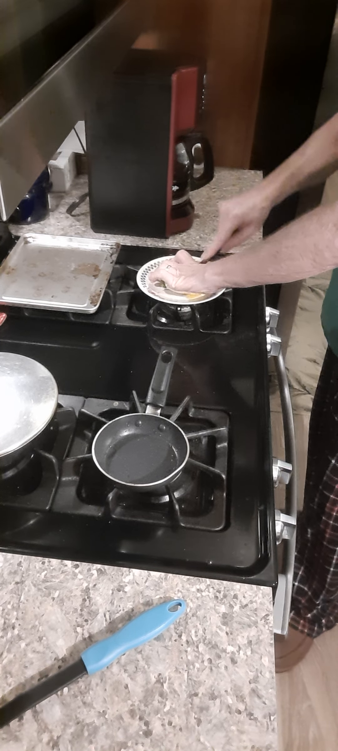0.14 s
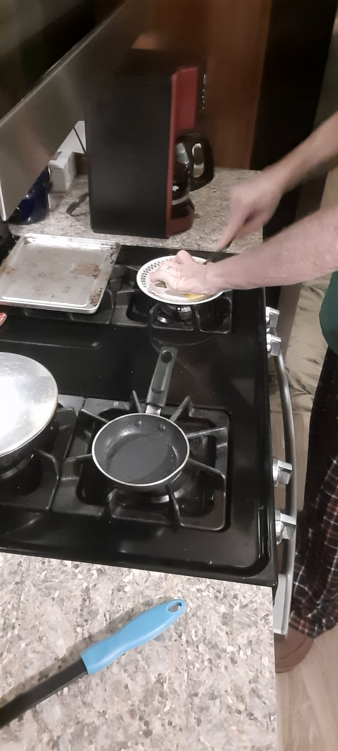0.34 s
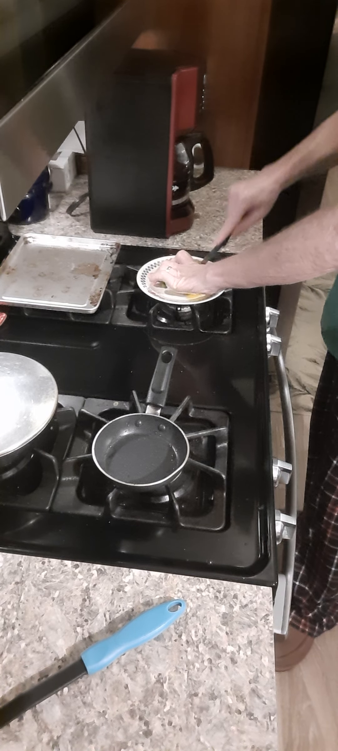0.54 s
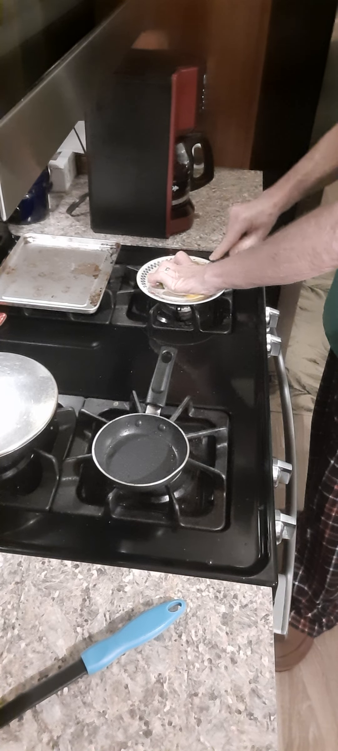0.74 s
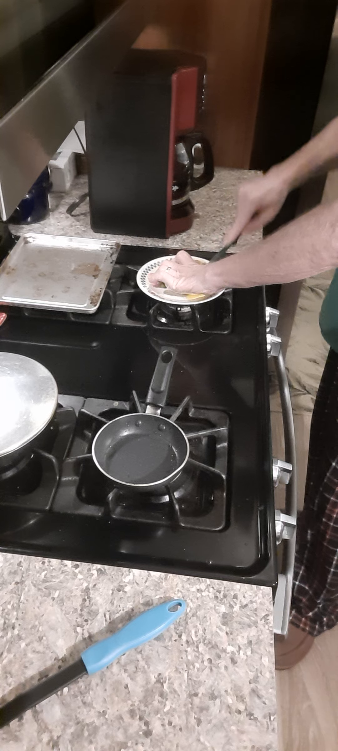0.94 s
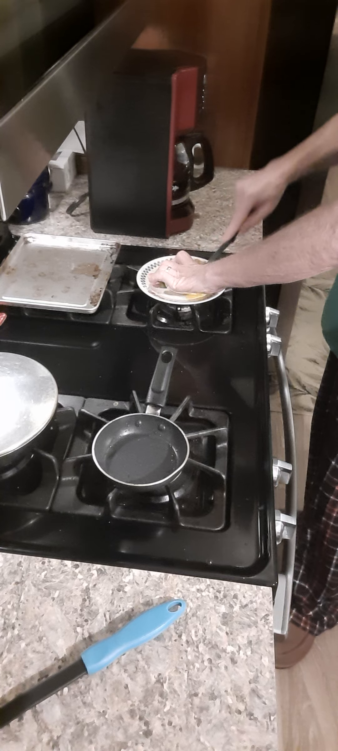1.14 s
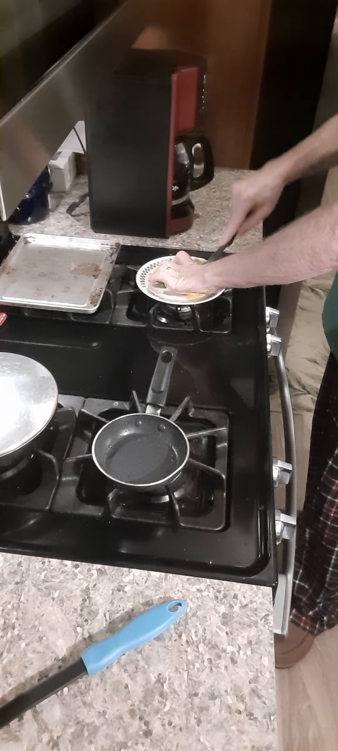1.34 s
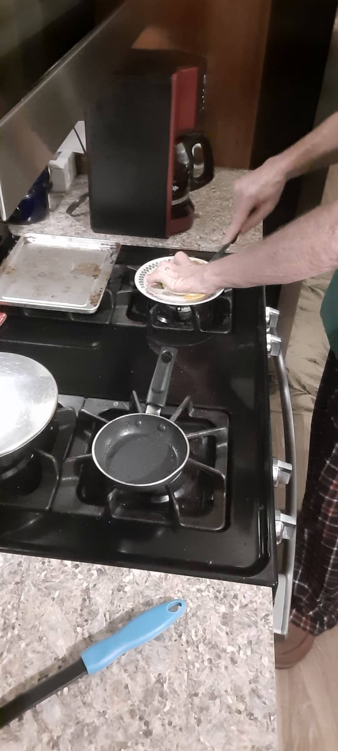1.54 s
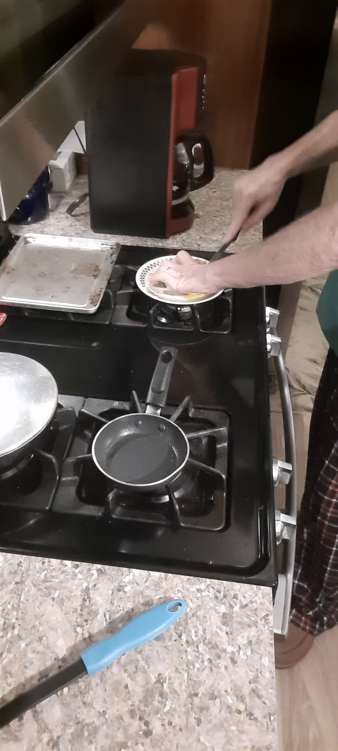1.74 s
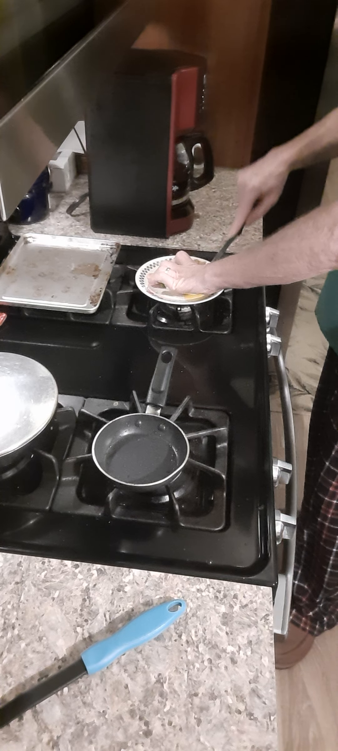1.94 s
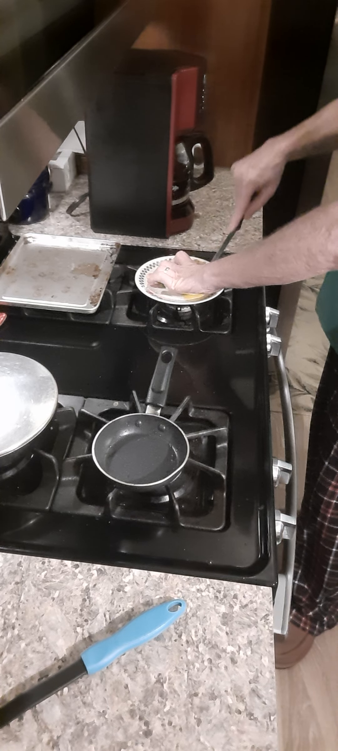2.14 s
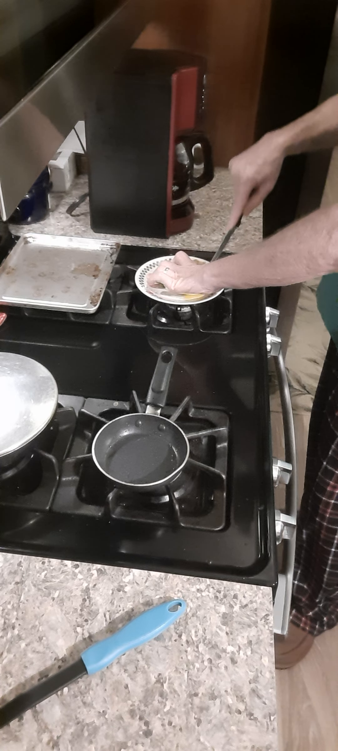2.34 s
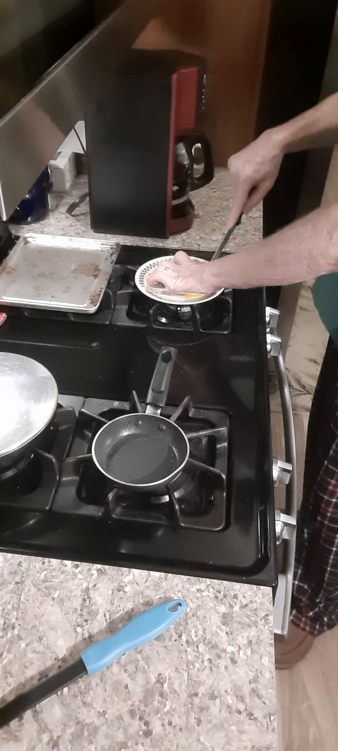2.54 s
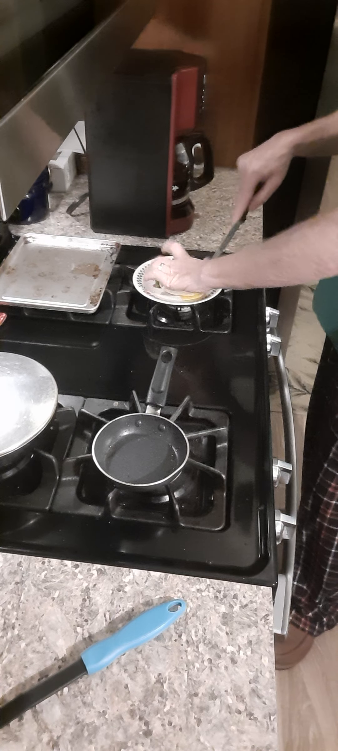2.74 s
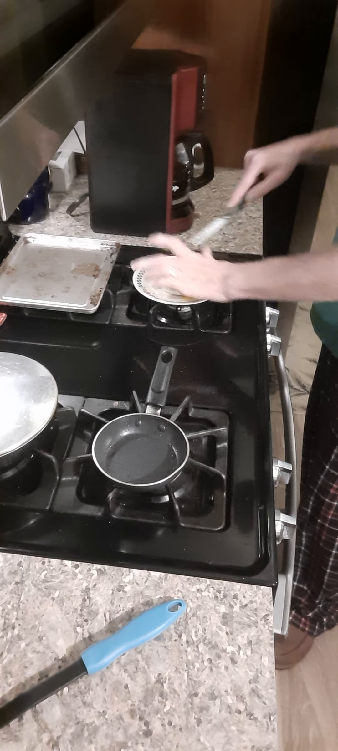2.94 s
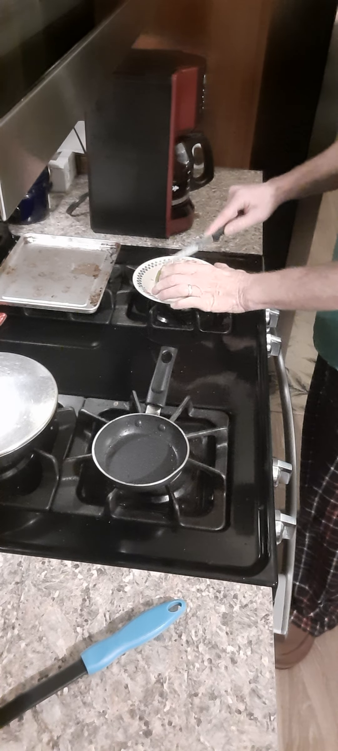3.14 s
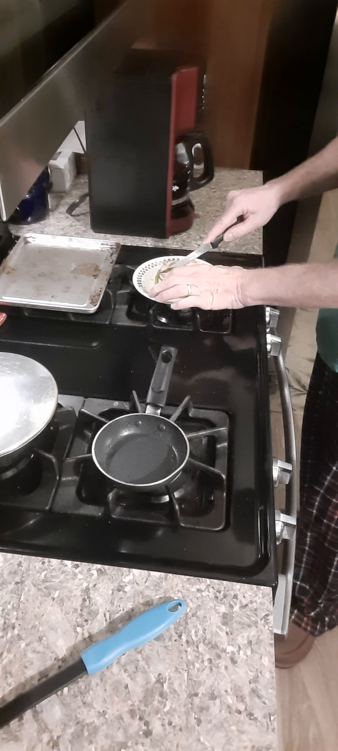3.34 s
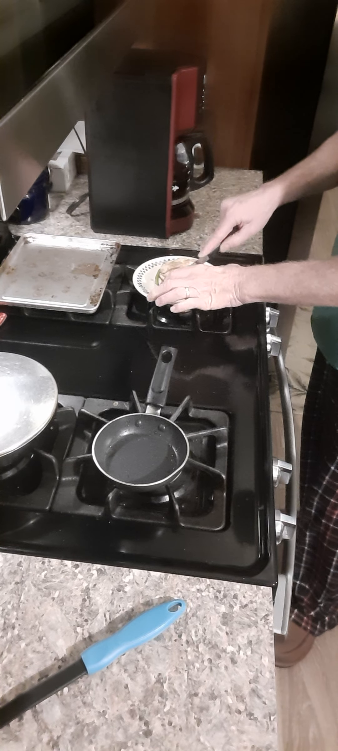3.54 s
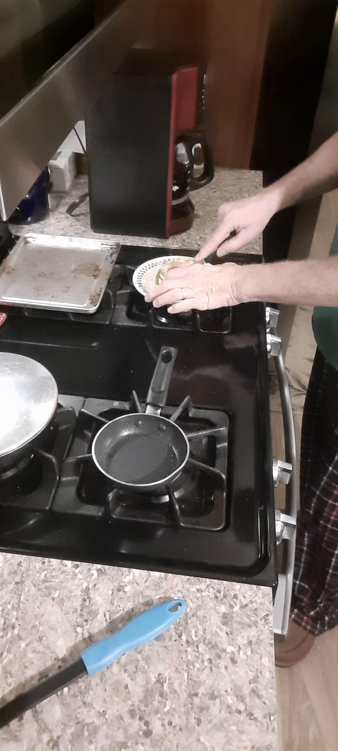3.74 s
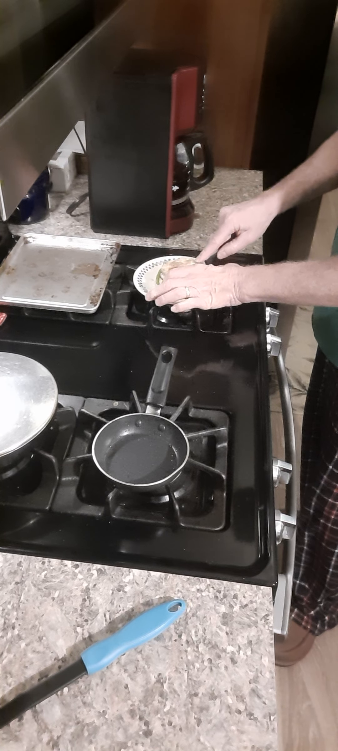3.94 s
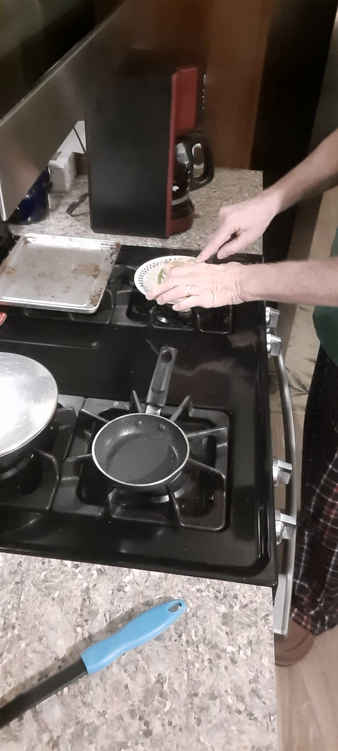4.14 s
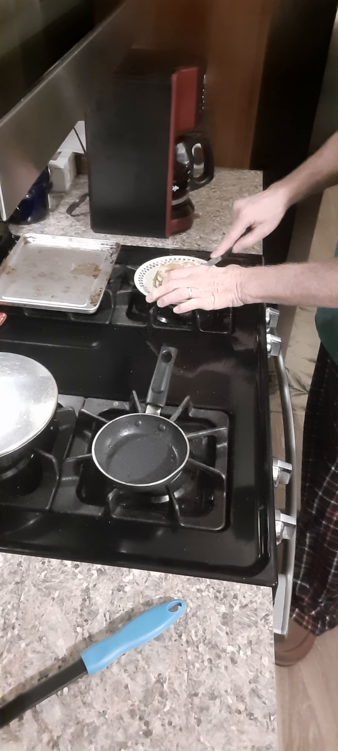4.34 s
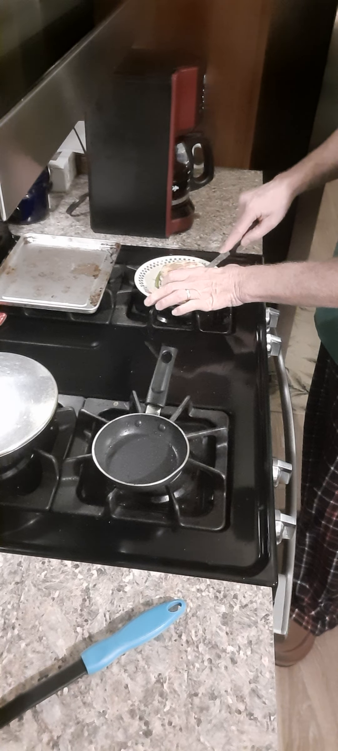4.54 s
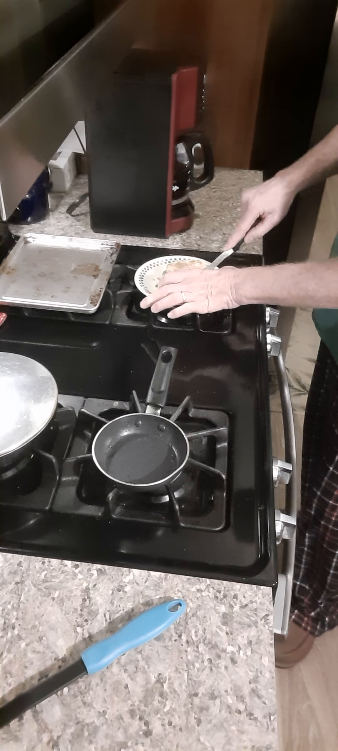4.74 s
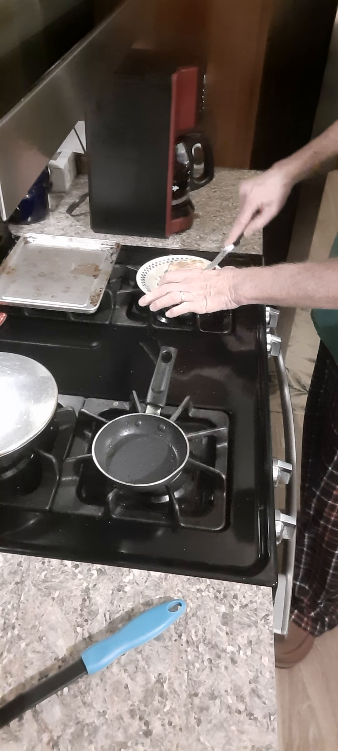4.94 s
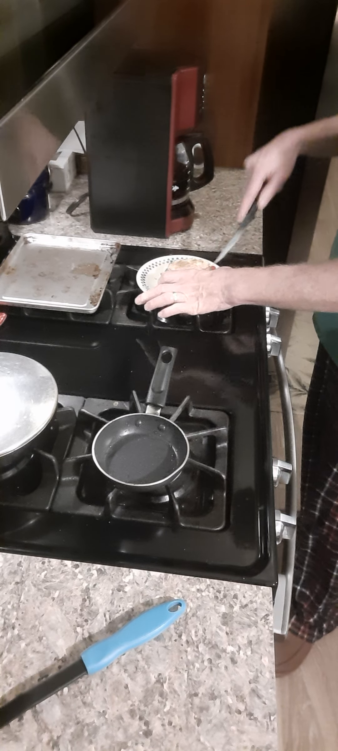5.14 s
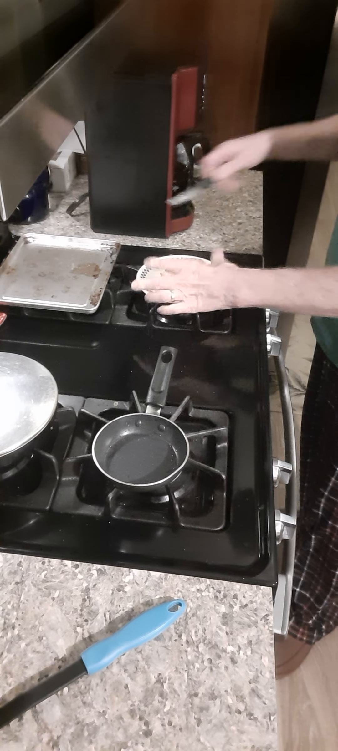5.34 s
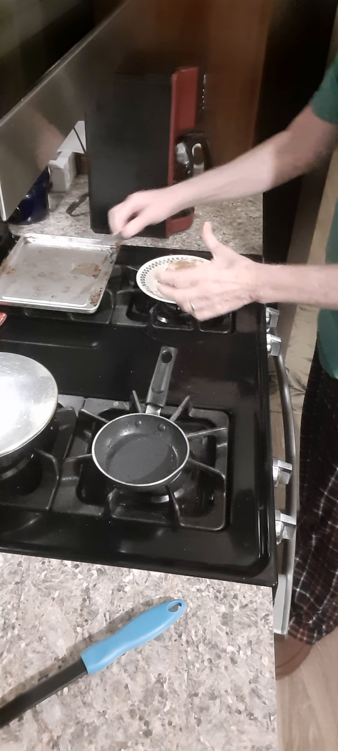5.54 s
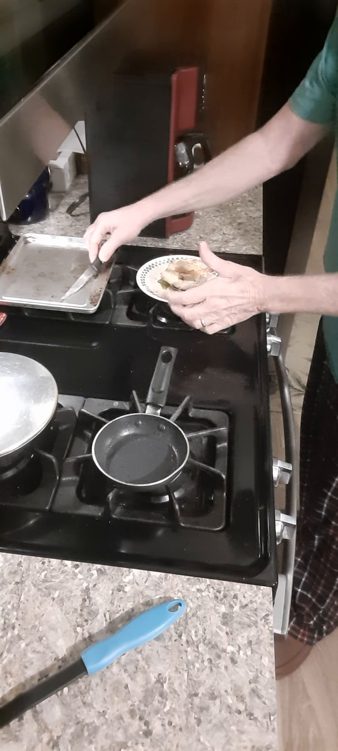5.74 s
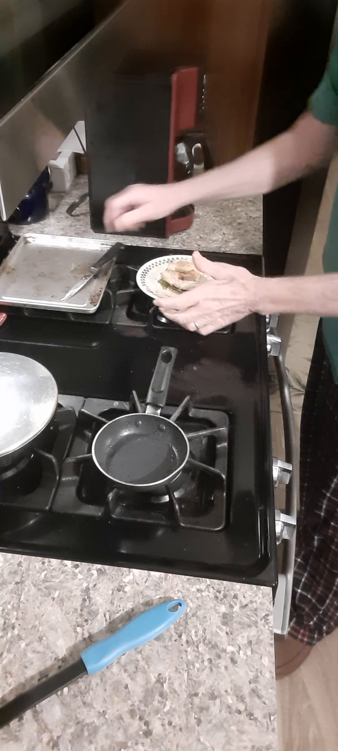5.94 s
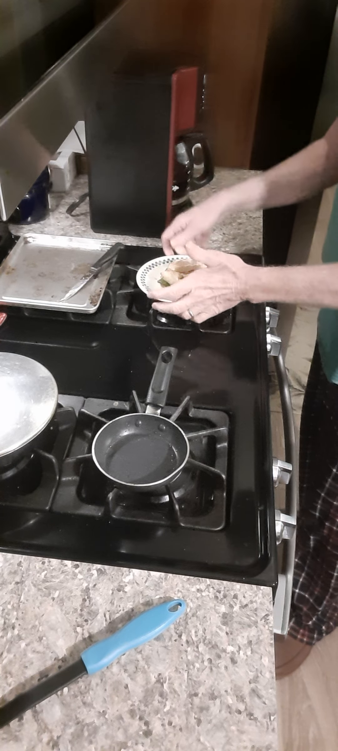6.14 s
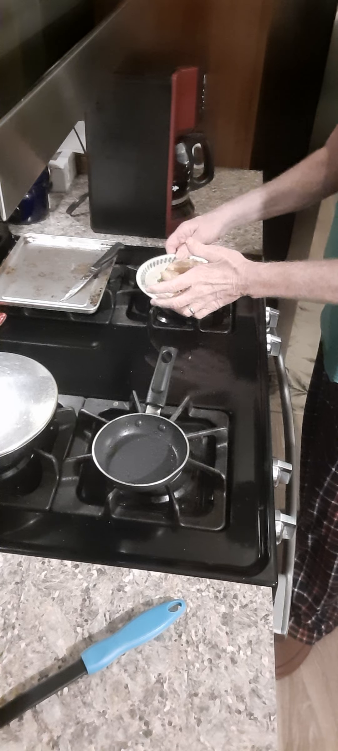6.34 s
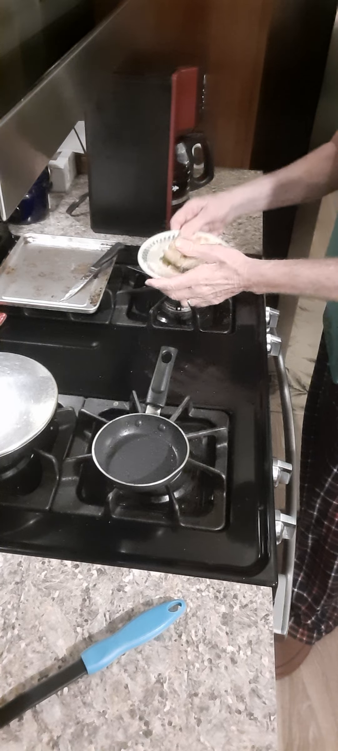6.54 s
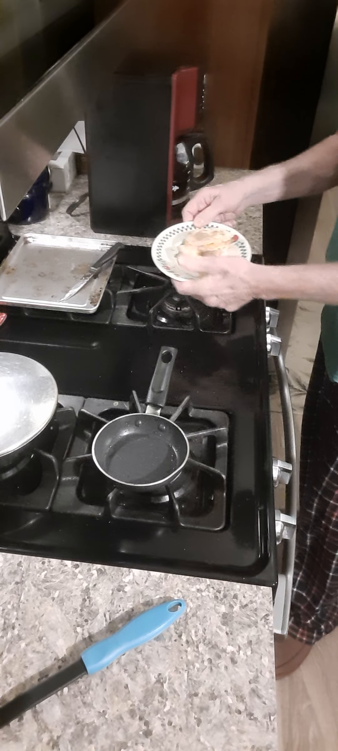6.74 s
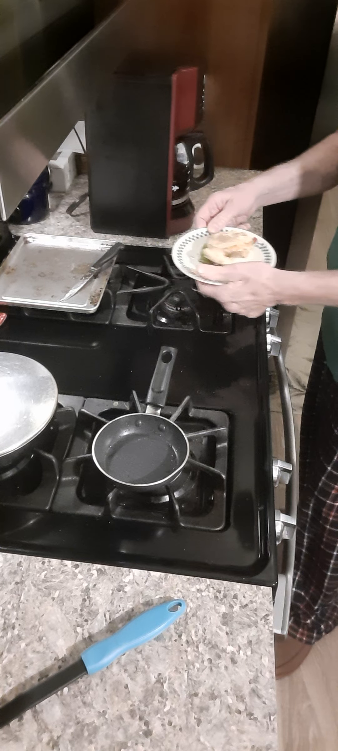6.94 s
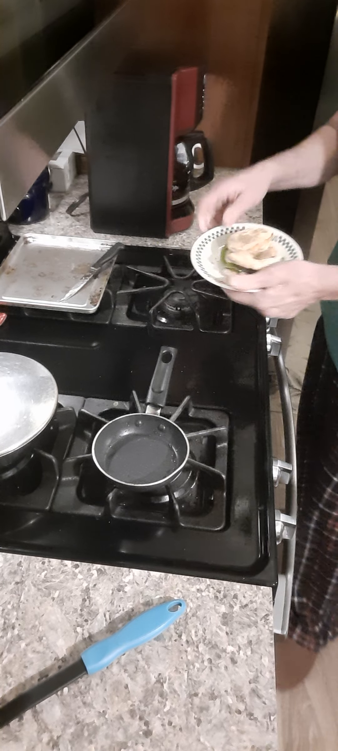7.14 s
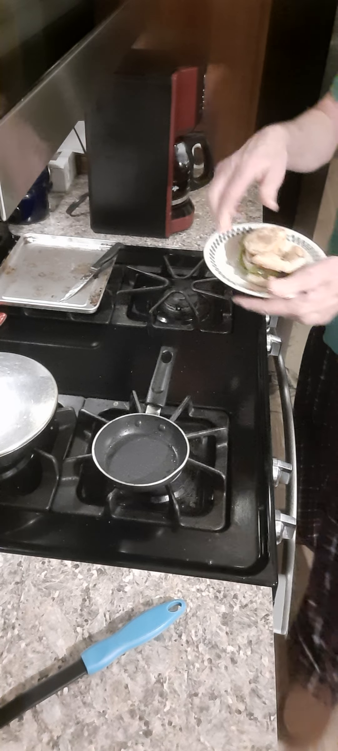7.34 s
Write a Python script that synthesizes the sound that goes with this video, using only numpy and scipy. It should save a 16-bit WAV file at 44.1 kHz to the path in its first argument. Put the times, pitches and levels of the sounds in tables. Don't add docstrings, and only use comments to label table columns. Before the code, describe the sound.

A knife saws crunchily through a toasted sandwich on a plate, pauses, cracks the last crust, then clatters onto a thin metal tray.

```python
import sys
import numpy as np
from scipy import signal
from scipy.fft import rfft, irfft
from scipy.io import wavfile

SR = 44100
rng = np.random.default_rng(int(sys.argv[2]) if len(sys.argv) > 2 else 0)


def store_pcm(level_fs):
    pcm = np.round(np.clip(level_fs, -1, 1) * 32767).astype(np.int16)
    wavfile.write(sys.argv[1], SR, np.atleast_2d(pcm).T)


def gain_from_decibels(decibels):
    exponent = np.asarray(decibels, float) / 20
    return 10 ** exponent


N = 329899


def rms_one(x):
    return x / np.sqrt(np.mean(x ** 2) + 1e-20)


def shape(x, points, lag_s=0.):
    size = 16384
    half = size // 2
    point_hz, point_db = np.transpose(points)
    hz = np.arange(half + 1) * SR / size
    db = np.interp(np.log(hz + 1), np.log(point_hz + 1), point_db)
    cepstrum = irfft(np.log(gain_from_decibels(db)), size)
    cepstrum[1:half] *= 2
    cepstrum[half + 1:] = 0
    delay = -2j * np.pi * hz * lag_s
    response = irfft(np.exp(rfft(cepstrum) + delay), size)[:half]
    response = response.reshape((1,) * (x.ndim - 1) + (-1,))
    return signal.fftconvolve(x, response, axes=-1)[..., :N]


def highpass(x, hz):
    return signal.sosfilt(signal.butter(2, hz, "high", fs=SR, output="sos"), x)


def lowpass(x, hz):
    return signal.sosfilt(signal.butter(2, hz, fs=SR, output="sos"), x)


def resonate(x, hz, width_hz):
    r = np.exp(-np.pi * width_hz / SR)
    feedback = [1, -2 * r * np.cos(2 * np.pi * hz / SR), r * r]
    return signal.lfilter(np.array([1, 0, -1]) * (1 - r * r) / 2, feedback, x)


def strike(times, dbs, modes, spread_db):
    luck = rng.standard_normal((len(times), len(modes)))
    out = np.zeros(N)
    for (hz, db, t60), chance in zip(modes, luck.T):
        clicks = np.full(N, 1e-18)
        clicks[(times * SR).astype(int)] = gain_from_decibels(dbs + db + spread_db * chance)
        r, w = gain_from_decibels(-60 / (t60 * SR)), 2 * np.pi * hz / SR
        out += signal.lfilter([0, np.sin(w)], [1, -2 * r * np.cos(w), r * r], clicks)
    return out


def bursts(times, dbs, rises, t60s):
    out = np.zeros(N)
    for s, db, rise, t60 in np.broadcast(times, dbs, rises, t60s):
        rise, t60 = max(rise, 2e-4), max(t60, .01)
        start = int(s * SR)
        t = np.arange(min(round((rise + t60) * SR), N - start)) / SR
        swell = np.sin(np.pi / 2 * np.minimum(t / rise, 1))
        fade = gain_from_decibels(-60 * np.maximum(t - rise, 0) / t60)
        out[start:start + len(t)] += gain_from_decibels(db) * swell * fade
    return out


def grains(per_s, spread_db, apart=0.96):
    sizes = gain_from_decibels(spread_db * np.minimum(rng.exponential(1, N), 5)) * rng.choice([-1, 1], N)
    clicks = sizes * (rng.random(N) < per_s / SR)
    return rms_one(clicks * (1 + apart * rng.standard_normal((2, N))))


def drift(per_s, count):
    knots = rng.standard_normal((count, 400))
    return [np.interp(np.arange(N) * per_s / SR, np.arange(400), row) for row in knots]


def crumbs(per_s, spectrum, cycles, patchy_db):
    hz, db = np.transpose(spectrum)
    pitches = np.geomspace(hz[1], hz[-2], num=10)
    levels = np.interp(np.log(pitches), np.log(hz), db)
    clicks = grains(per_s, 2.2)
    dealt = rng.integers(0, 10, N)
    out = np.zeros((2, N))
    for k, slow in enumerate(drift(25, count=10)):
        ringing = resonate(clicks * (dealt == k), pitches[k], pitches[k] / cycles)
        out += gain_from_decibels(levels[k] + patchy_db * slow) * ringing
    return rms_one(out)


def rubbed(noise, rows, width_share):
    out = np.zeros(noise.shape)
    for s, db, hz, rise, t60 in rows:
        span = slice(max(int(s * SR) - 2000, 0), int(s * SR) + SR)
        width_hz = width_share * hz
        tone = resonate(resonate(noise[..., span], hz, width_hz), hz, width_hz)
        out[..., span] += bursts([s], db, rise, t60)[span] * rms_one(tone)
    return out


# start_s, swell_s, grate_shaking_db, fade_t60_s, coarse_crumbling_db (relative to the shaking)
STROKES = [(0, 0.0016, -41, 0.39, -1.5), (0.109, 0.081, -34.5, 0.42, -1), (0.423, 0.07, -35, 0.59, -10),
           (0.722, 0.12, -40, 0.67, -8), (1.04, 0.047, -37.5, 1.35, -3), (1.239, 0.045, -35.5, 0.25, -12),
           (1.32, 0.019, -38.5, 0.64, -0.5), (1.477, 0.052, -35.5, 0.87, -13.5),
           (1.56, 0.023, -32.5, 0.3, -1.5), (1.72, 0.042, -38, 1.36, -25), (6.2, 0.015, -50.5, 0.31, -21.5),
           (1.93, 0.077, -39, 0.39, -3.5), (2.04, 0.019, -50, 1.1, -20), (2.26, 0.031, -36.5, 0.34, -15.5),
           (2.358, 0.04, -36.5, 0.35, 0), (2.44, 0.06, -31, 0.19, -4.5), (2.588, 0.016, -38, 0.92, 0),
           (2.659, 0.053, -47, 0.36, 0.5), (4.03, 0.048, -59, 0.27, -1.5), (3.62, 0.014, -48, 0.59, 6),
           (4.221, 0.23, -52, 0.45, -3), (4.641, 0.022, -57, 1.2, -15), (4.88, 0.044, -63, 0.3, -11),
           (5.56, 0.052, -65.5, 0.6, 5), (6.34, 0.049, -47.5, 0.32, -7.5)]
# start_s, level_db, coarse_db (relative), t60_s
BITES = [(0.107, -24, -5, 0.088), (0.1343, -19.5, -0.5, 0.1), (.1612, -19.5, -14.5, 0.11),
         (0.2577, -28.5, -5.5, 0.061), (0.4299, -26, -9.5, 0.12), (0.45, -21, -4.5, 0.11),
         (0.507, -30, -30.5, 0.093), (0.563, -32, -32, 0.12), (0.612, -23.5, -14, 0.072),
         (.727, -27, -11.5, 0.24), (0.7957, -22.5, -11, 0.06), (0.81, -19, -3.5, 0.045),
         (0.897, -31, -2.5, 0.11), (1.032, -30, -4, 0.2), (1.0909, -9, -8.5, 0.03), (1.101, -18, -6, 0.048),
         (1.2563, -28.5, 1.5, 0.087), (1.319, -24, -31.5, 0.055), (1.373, -26, -1.5, 0.033),
         (1.4854, -28, -8.5, 0.13), (1.5075, -22, -19, 0.14), (1.5666, -26.5, -39, 0.077),
         (1.598, -21.5, -7.5, 0.1), (1.688, -30.5, -9, 0.093), (1.7278, -18, -17.5, 0.11),
         (1.801, -29, -7, 0.19), (1.946, -25, -20, 0.094), (1.975, -18.5, -20.5, 0.055),
         (2.037, -24.5, -11, 0.12), (2.061, -13.5, -19.5, 0.088), (2.154, -32.5, -18.5, 0.12),
         (2.2594, -21.5, -13.5, 0.12)]
# start_s, level_db, coarse_db (relative), t60_s
TOUCHES = [(2.6556, -36, -13, 0.058), (2.716, -39, -20, 0.27), (3.33, -52, -14, 0.14),
           (3.376, -53, -20, 0.081), (4.028, -47.5, -26, 0.2), (4.069, -48, -16, 0.17),
           (4.2966, -43, -33, 0.053), (4.333, -36.5, -7.5, 0.18), (4.3795, -27.5, -19, 0.031),
           (4.406, -39, -1.5, 0.059), (4.572, -43, -17, 0.084), (4.5865, -55, -32, 0.11),
           (4.6453, -39, -12, 0.081), (4.8913, -39, -9.5, 0.14), (4.9856, -56, -35, 0.11),
           (5.051, -47.5, -22, 0.075), (5.1487, -58, -20, 0.069), (5.305, -58.5, -20, 0.059),
           (6.205, -49, -5, 0.028), (6.356, -39, -11.5, 0.087), (6.43, -47.5, -19, 0.087),
           (6.539, -48, -43, 0.11), (6.93, -59, -30.5, 0.14)]
# time_s, level_db
CONTACT = [(0, -46), (1.6, -46.5), (2.2, -59), (2.7, -41), (2.899, -96.5), (3.45, -77), (3.609, -50.5),
           (3.97, -66.5), (4.18, -75), (4.35, -51), (4.8, -56), (5.4, -69), (5.599, -66), (5.779, -89.5),
           (6.301, -72), (6.75, -65.5), (7.25, -68), (7.48, -61)]
# pitch_hz, level_db (per Hz)
FINE = [(3500, -36), (5000, 3.5), (7000, 2.5), (12000, 4), (15500, 2.5), (16000, -3.5)]
# pitch_hz, level_db (per Hz)
COARSE = [(450, -30.5), (700, -13), (1800, 4), (2600, -14), (3500, 3.5), (4600, -9.5), (6000, -19.5)]


def crust():
    s, swell, push_db, fade, coarse_db = np.transpose(STROKES)
    at, db, rel_db, t60 = np.transpose(BITES + TOUCHES)
    pan_db = 5 * rng.standard_normal(len(at))
    fine = crumbs(12000, FINE, cycles=1.8, patchy_db=6.0)
    coarse = crumbs(4000, COARSE, cycles=5.1, patchy_db=6.0)

    touch = gain_from_decibels(np.interp(np.arange(N) / SR, *np.transpose(CONTACT)) - 13.0)
    steady_fine = touch + bursts(s, push_db - 17, swell, 0.2 * fade)
    steady_coarse = gain_from_decibels(-7) * touch + bursts(s, push_db + coarse_db - 8.5, swell, 0.81 * fade)

    def snaps(level_db):
        return np.array([bursts(at, level_db + side * pan_db, 0.16 * t60, t60) for side in (.5, -.5)])

    snap_fine, snap_coarse = snaps(db - 16.5), snaps(db + rel_db - 9.0)
    return (steady_fine + snap_fine) * fine + (steady_coarse + snap_coarse) * coarse


# pitch_hz, width_hz, level_db
GRATE = [(266, 83, 4.5), (327, 100, 2.5), (444.3, 190, -6), (606, 42, -16)]


def grate():
    s, swell, db, fade, _ = np.transpose(STROKES)
    pushes = grains(900, 1.4, apart=0.3)
    shaking = np.zeros((2, N))
    for (hz, width_hz, level_db), slow in zip(GRATE, drift(12, count=len(GRATE))):
        shaking += gain_from_decibels(level_db + 4.1 * slow) * rms_one(resonate(pushes, hz, width_hz))
    rocking = rms_one(resonate(pushes.sum(axis=0), 95, 33))
    shaken = bursts(s, db - 6.5, swell, fade) * rms_one(shaking)
    rocked = bursts(s + 0.0063, db - 12.5, 1.7 * swell, .7 * fade) * rocking
    return shaken + rocked


# start_s, level_db, pitch_hz, rise_s, t60_s
RUBS = [(4.238, -57.5, 654, 0.03, 0.13), (4.335, -54.5, 7000, 0.0028, 0.15),
        (4.381, -48.5, 7000, .0026, 0.16), (4.9, -63, 1760, 0.037, 0.08), (4.9, -61.5, 1050, 0.045, 0.14),
        (5.44, -76, 3500, 0.099, .3), (5.58, -71.5, 2730, 0.061, 0.52), (6.774, -48.5, 5910, 0.0023, .14),
        (6.776, -49, 11370, 0.00064, 0.043), (7.117, -63, 14000, .001, 0.042),
        (7.33, -77.5, 6620, 0.053, .3), (4.339, -49, 1140, 0.0021, 0.16), (4.345, -62, 2250, .01, 0.22),
        (4.36, -62, 3650, .03, .2), (4.9, -83, 3000, 0.035, .1), (6.208, -72, 12800, 0.0089, 0.067),
        (0, -53, 1025, .003, .15), (6.361, -55, 920, 0.018, 0.19)]


def rubs():
    return rubbed(grains(8700, 0.97), RUBS, width_share=0.078)


# pitch_hz, level_db (per Hz)
ROOM_TONE = [(20, -42), (36, -17.5), (52, -4), (72, -0.5), (229, -11.5), (354, -6), (394, -5), (451, -13),
             (531, -16), (641, -27), (1560, -41.5), (3200, -48), (4740, -49), (6740, -35.5), (9320, -56.5),
             (12500, -39), (16000, -46.5)]
# pitch_hz, level_db (rms), unsteady_share
HUM = [(58.1, -61.5, 0.67), (103.6, -68, 0.94), (396.6, -62, 0.036)]


def room_tone():
    mid, side = shape(rng.standard_normal((2, N)), ROOM_TONE)
    side = shape(side, [(50, -20.5), (120, -2.5), (250, -4.5), (700, 3.5), (2000, 0.5)])
    rumble = gain_from_decibels(-54.5 - 6.5) * np.array([mid + side, mid - side]) / np.std(mid)

    t, wobble = np.arange(N) / SR, drift(16, count=6)
    hum = np.zeros(N)
    for k, (hz, db, share) in enumerate(HUM):
        in_phase = (1 + share * wobble[k]) * np.sin(2 * np.pi * hz * t)
        out_of_phase = share * wobble[k + 3] * np.cos(2 * np.pi * hz * t)
        hum += gain_from_decibels(db) * np.sqrt(2) * (in_phase + out_of_phase)
    return rumble + hum


# start_s, level_db, coarse_db (relative)
CRACKS = [(0.143, -25.5, -16), (0.1725, -14, -21), (0.374, -25.5, -13.5), (0.4585, -11.5, -5.5),
          (0.617, -33.5, -31), (0.813, -10.5, -7.5), (0.92, -22, -13.5), (1.093, -2.5, -12),
          (1.0982, -6.5, -12.5), (1.377, -18.5, -4.5), (1.507, -17.5, -10), (1.6917, -24.5, -12),
          (1.9205, -19.5, -9.5), (1.9782, -19, -32.5), (2.065, -20, 4.5), (2.6132, -14.5, -20),
          (3.6268, -8, -17.5), (3.6306, -4.5, -18.5), (4.3373, -27.5, -3.5), (4.573, -37, -14),
          (4.586, -41, -8), (4.6467, -28, -17), (4.9879, -41, -23), (6.356, -39, -24), (6.538, -37.5, -34)]
# pitch_hz, level_db, t60_s
CRACK_BODY = [(1750, -11, 0.01), (1860, 0.5, .04), (2140, 0, 0.055), (2460, -10, 0.0083),
              (3490, -0.5, 0.026), (3930, -5.5, 0.017)]


def cracks():
    at, db, rel_db = np.transpose(CRACKS)
    t60_s = 0.012
    bright, coarse = (rms_one(shape(grains(15000, 1.7), spectrum)) for spectrum in (FINE, COARSE))
    click = np.zeros(N)
    click[(at * SR).astype(int)] = gain_from_decibels(db - 3.0)
    splinters = bursts(at, db - 13.0, 0.00032, t60_s) * bright
    splinters = splinters + bursts(at, db + rel_db - 18, 0.00023, t60_s) * coarse
    return splinters + shape(click, FINE) + strike(at, db + rel_db - 16.0, CRACK_BODY, spread_db=4.0)


# start_s, pitch_hz, level_db, t60_s, left_over_right_db
LONG_RINGS = [(2.268, 4156, -51, .4, 6), (2.369, 4156, -37, .3, -2), (2.465, 4156, -41, .5, -3),
              (2.613, 4156, -45, .6, -2), (2.49, 3021, -52, .6, 8), (2.612, 3021, -52, .7, 8),
              (2.717, 3021, -55, 1.1, 8), (6.78, 5713, -61, .45, 6), (6.78, 5582, -66, .35, 3),
              (6.78, 6728, -66, .4, 0), (5.91, 2729, -49.5, .65, 6), (5.91, 3840, -52, .65, 4),
              (5.82, 4156, -45, .6, -4), (5.91, 1233, -49, .55, 3)]


def long_rings():
    out = np.zeros((2, N))
    for s, hz, db, t60, pan_db in LONG_RINGS:
        ring = strike(np.array([s]), 0, [(hz, db, t60)], spread_db=0)
        out += ring * gain_from_decibels(np.array([[pan_db / 2], [-pan_db / 2]]))
    return out


# start_s, level_db, ring_db (relative), rise_s, scrape_t60_s
PLATE_TICKS = [(2.3536, -28, -10, 0.0045, 0.1), (2.367, -17.5, -9.5, 0.0029, 0.094),
               (2.384, -30, -19, 0.0036, 0.13), (2.4506, -31.5, -17, .001, .06),
               (2.464, -17.5, -21.5, .001, 0.057), (2.473, -21, -15, 0.0042, 0.048),
               (2.487, -20.5, -14, 0.0009, 0.045), (2.494, -26.5, -15, .003, 0.029),
               (2.5885, -20, -20.5, 0.00081, 0.054), (2.611, -19, -21, 0.0034, 0.064),
               (2.655, -29, -9.5, 0.003, 0.089), (2.6805, -33.5, -7, 0.0024, 0.092),
               (2.716, -32, -14, 0.0031, .09)]
# pitch_hz, level_db, t60_s
PLATE = [(1630, -8, 0.019), (3494, -19.5, 0.08), (5160, -21.5, 0.11), (5970, -13.5, 0.09),
         (7000, -11, 0.14), (7170, -14.5, 0.22), (7440, -14, 0.065), (12460, -16, .1), (12800, -17, 0.08),
         (13900, -20.5, .09), (14640, -12.5, .08)]


def plate():
    at, db, ring_db, rise, t60 = np.transpose(PLATE_TICKS)
    grit = grains(8000, 0.82)
    bright = rms_one(shape(grit, [(800, -3.5), (2000, -12), (7000, 0.5), (16000, -0.5)]))
    sung = sum(gain_from_decibels(level_db) * rms_one(resonate(grit, hz, 9.5 / ring)) for hz, level_db, ring in PLATE)
    scrape = bursts(at, db - 8, rise, t60) * (bright + gain_from_decibels(-9.0) * rms_one(sung))
    return scrape + strike(at, db + ring_db, PLATE, spread_db=4.0)


# start_s, level_db, t60_s
KNOCK = [
    (3.6269, -4.5, 0.09),
    (3.683, -24.5, 0.19),
    (3.705, -25, 0.33),
]
# pitch_hz, width_hz, level_db
KNOCK_BODY = [(1880, 320, 4), (3326, 560, 4.5), (5600, 500, 1), (7000, 1200, -9.5), (8700, 1300, 0.5),
              (9940, 670, 0), (13300, 500, -7), (12600, 500, -5.5), (14800, 570, -12)]


def knock():
    at, db, t60 = np.transpose(KNOCK)
    rattle = grains(6500, 0.7)
    body = np.zeros((2, N))
    for k, (hz, width_hz, level_db) in enumerate(KNOCK_BODY):
        tone = resonate(resonate(rattle, hz, width_hz), hz, 0.73 * width_hz)
        body += (-1) ** k * gain_from_decibels(level_db) * tone
    return bursts(at, db - 14.5, 0.0011, t60) * rms_one(body)


# start_s, level_db, pitch_hz, rise_s, t60_s
THUDS = [(3.64, -50.5, 190, 0.033, 0.48), (3.63, -43.5, 460, .02, .25), (4.9, -58.5, 86, .06, 0.28),
         (5.8, -47.5, 87, 0.071, 0.3), (5.98, -43.5, 234, 0.044, 0.31), (4.34, -56.5, 180, 0.027, 0.2),
         (4.86, -53, 100, 0.028, .2)]


def thuds():
    return rubbed(rng.standard_normal(N), THUDS, width_share=.4)


# start_s, level_db, rise_s, t60_s
TRAY_HITS = [(5.784, -11, 0.0013, 0.16), (5.793, -4, 0.0018, 0.06), (5.7985, -1.5, 0.002, 0.092),
             (5.809, -8.5, .001, .07), (5.8166, -13, 0.002, 0.17), (5.9069, -12.5, 0.002, 0.12),
             (5.929, -15, 0.0058, 0.082), (5.951, -23.5, 0.0061, 0.12)]
# pitch_hz, level_db (per Hz)
TRAY = [(140, -36), (230, -17.5), (783, -6.5), (902, -10.5), (3240, -16), (6950, -6.5), (7730, -6.5),
        (8910, -32.5), (9730, -1), (12900, -7.5), (16000, -4.5)]
# pitch_hz, width_hz, level_db
TRAY_SHEET = [(2030, 70, -2), (3000, 60, -6.5), (3500, 50, -3), (4150, 50, 0.5), (4670, 80, -7.5),
              (5300, 60, -4), (5950, 67, -5.5), (6200, 73, -4), (6720, 60, -2.5), (7530, 28, 3.5),
              (13140, 60, -4), (13310, 40, -2), (13700, 40, -1.5), (14180, 34, -0.5)]
# pitch_hz, level_db, t60_s
TRAY_MODES = [(247, -14.5, 0.3), (328, -12.5, 0.21), (540, -13.5, 0.22), (760, -14, 0.28),
              (799, -12.5, 0.55), (1035, -19.5, 0.25), (1330, -18.5, 0.12), (1876, -6.5, 0.25),
              (2200, -11.5, 0.15), (3420, -19, 0.18), (6400, -19, 0.1), (8700, -6.5, .06),
              (13200, -12.5, .08)]


def tray():
    at, db, rise, t60 = np.transpose(TRAY_HITS)
    span = slice(int(at[0] * SR) - 2000, int(at[0] * SR) + SR)
    rattle = grains(15000, 1.0)[:, span]
    lines = sum(gain_from_decibels(level_db) * rms_one(resonate(rattle, hz, width_hz))
                for hz, width_hz, level_db in TRAY_SHEET)
    sheet = rms_one(shape(rattle, TRAY)[:, :rattle.shape[1]]) + gain_from_decibels(-7.5) * rms_one(lines)
    low = lowpass(sheet, 4500)
    high_envelope = bursts(at, db - 17.5, rise, 1.1 * t60)[span]
    low_envelope = bursts(at, db - 21, 3 * rise, 3.46 * t60)[span]
    crash = np.zeros((2, N))
    crash[:, span] = high_envelope * (sheet - low) + low_envelope * low
    return crash + highpass(strike(at, db - 26.5, TRAY_MODES, spread_db=2.5), 190)


def kitchen(x):
    walls_t60_s, counter_t60_s = 0.44, 0.025
    t = np.arange(SR // 2) / SR
    near, far = rng.standard_normal((2, 2, len(t))) * (1 - np.exp(-t / 0.00051))
    dull = lowpass(far, 4000)
    far = dull * gain_from_decibels(-60 * t / walls_t60_s) + (far - dull) * gain_from_decibels(-60 * t / (.6 * walls_t60_s))
    near = near * gain_from_decibels(-60 * t / counter_t60_s)
    tail = gain_from_decibels(-8.5) * rms_one(far) + gain_from_decibels(-4) * rms_one(near)
    tail = highpass(tail, 500) / np.sqrt(len(t))
    return signal.fftconvolve(x, tail, axes=1)[:, :N]


# pitch_hz, level_db
LEFT_OVER_RIGHT = [(60, -10.5), (110, -5.5), (200, 4.5), (380, 6.5), (700, 3), (1290, 5.5), (2380, 10.5),
                   (4400, 4.5), (8120, -2), (15000, 6)]
# pitch_hz, level_db
MIC = [(20, 3), (4500, -1), (5500, 3), (7000, 10.5), (8000, -1), (8700, -8.5), (9150, -10), (9600, -3.5),
       (10500, -4.5), (11500, 1.5), (13200, 8.5), (15750, -1), (16050, -21.5), (16800, -39.5)]


def scene():
    close = crust() + cracks() + plate() + knock() + tray() + rubs()
    left = shape(close[0], [(hz, db / 2) for hz, db in LEFT_OVER_RIGHT])
    right = shape(close[1], [(hz, -db / 2) for hz, db in LEFT_OVER_RIGHT], lag_s=.00012)
    shaking = grate() * gain_from_decibels(np.array([[1.5], [-1.5]]))
    heard = np.array([left, right]) + kitchen(close + shaking) + shaking
    return shape(heard, MIC) + long_rings() + room_tone() + thuds()


def band_limit(x):
    return signal.sosfilt(signal.butter(12, 16820, fs=SR, output="sos"), x)


def record(dry):
    return band_limit(np.tanh(dry))


dry = scene()
out = record(dry)
store_pcm(out)
```